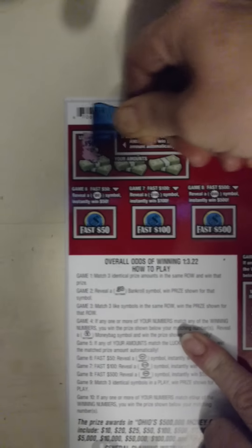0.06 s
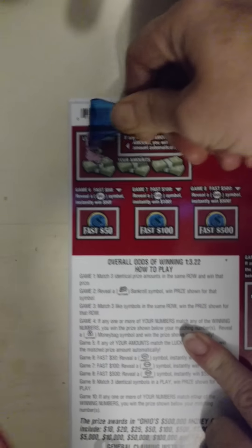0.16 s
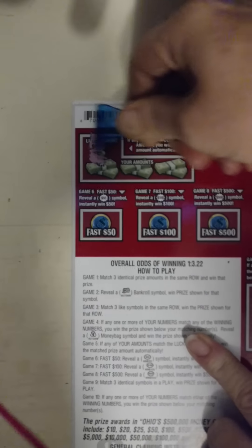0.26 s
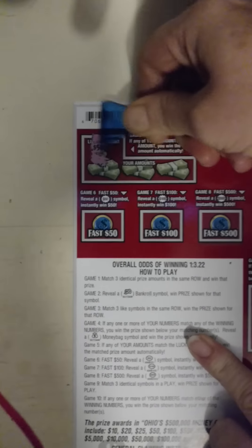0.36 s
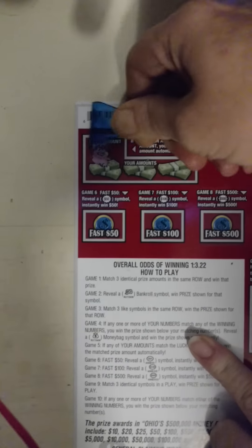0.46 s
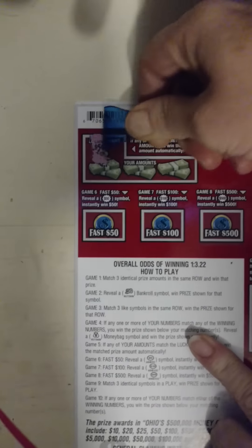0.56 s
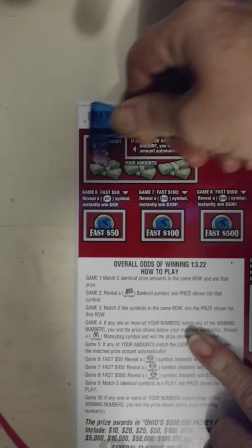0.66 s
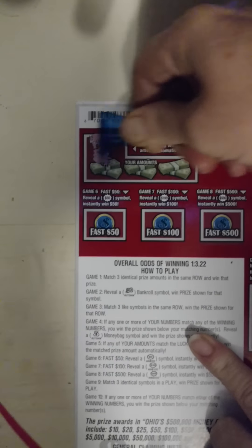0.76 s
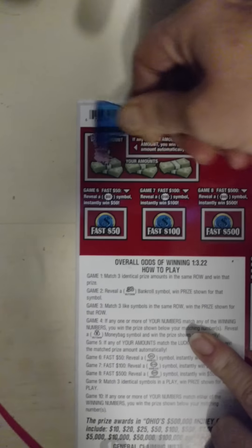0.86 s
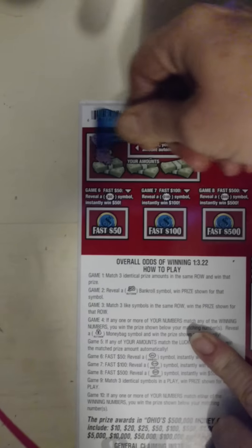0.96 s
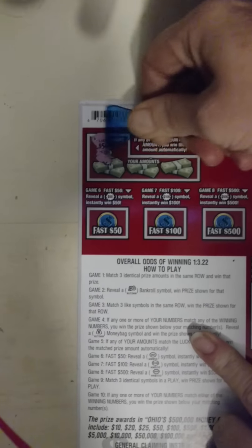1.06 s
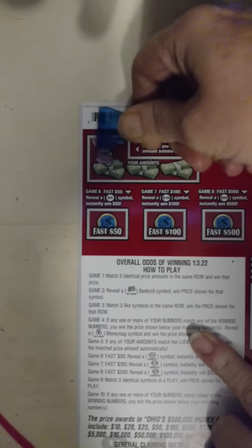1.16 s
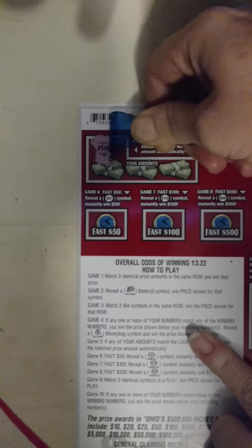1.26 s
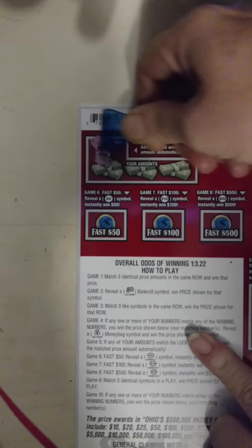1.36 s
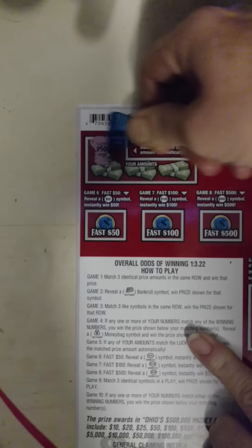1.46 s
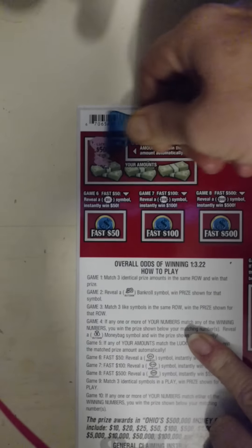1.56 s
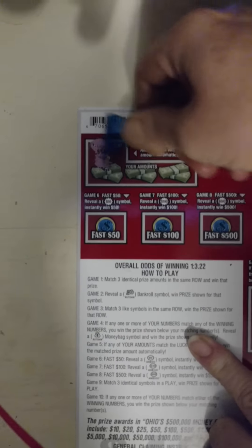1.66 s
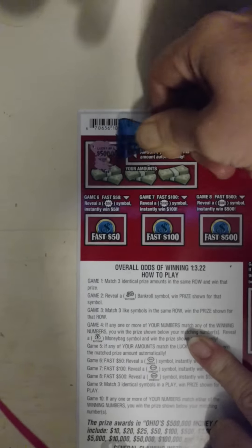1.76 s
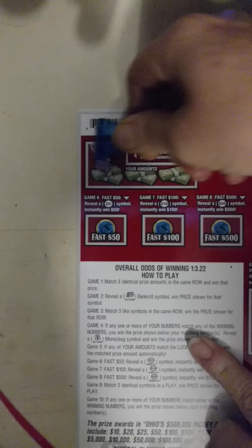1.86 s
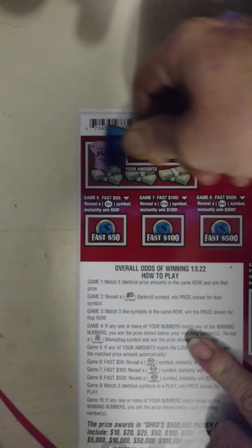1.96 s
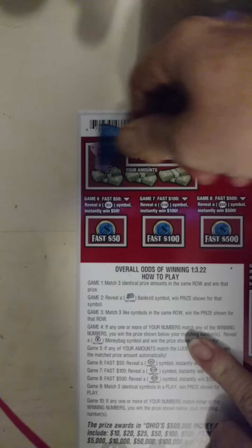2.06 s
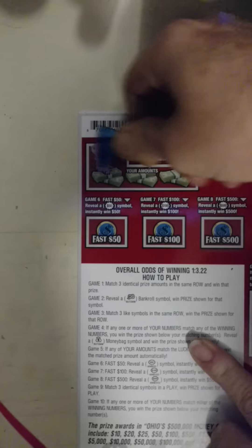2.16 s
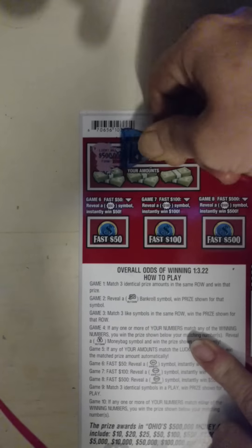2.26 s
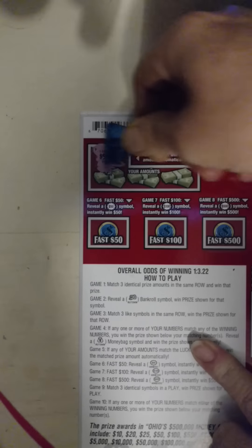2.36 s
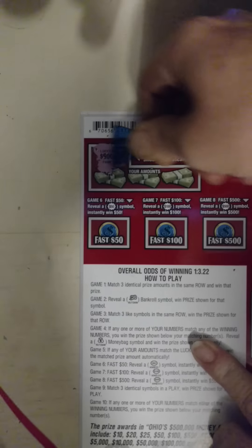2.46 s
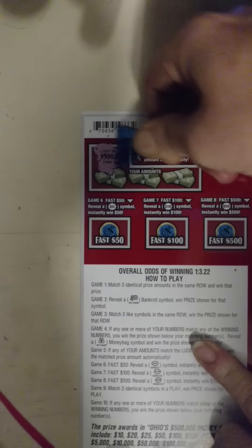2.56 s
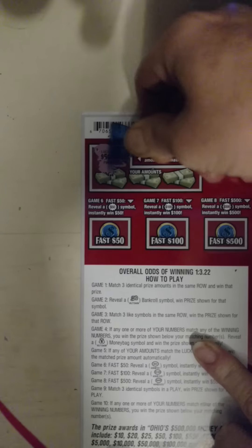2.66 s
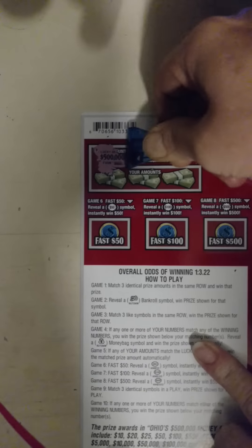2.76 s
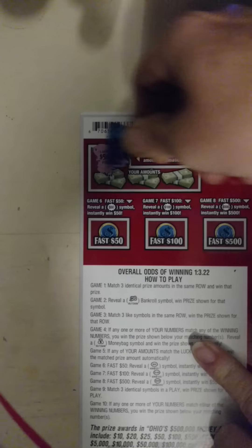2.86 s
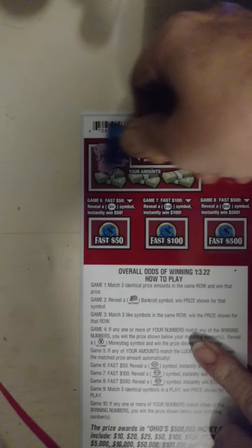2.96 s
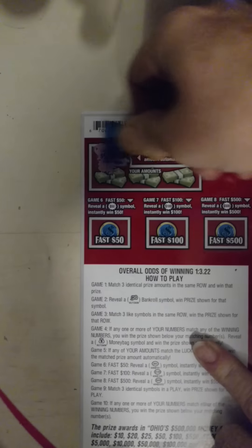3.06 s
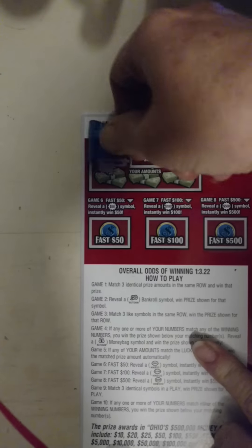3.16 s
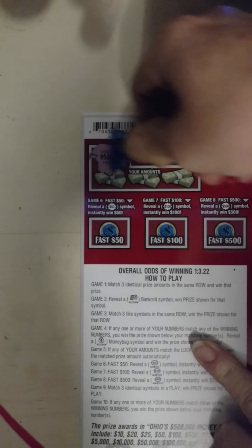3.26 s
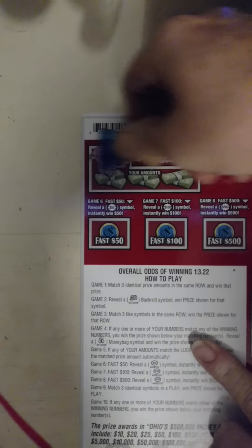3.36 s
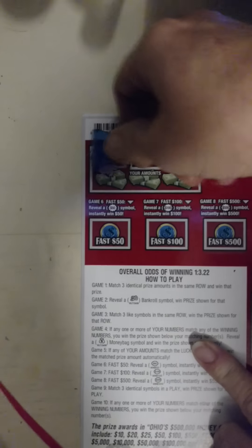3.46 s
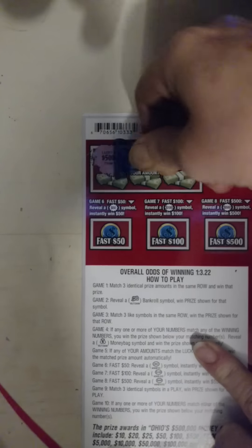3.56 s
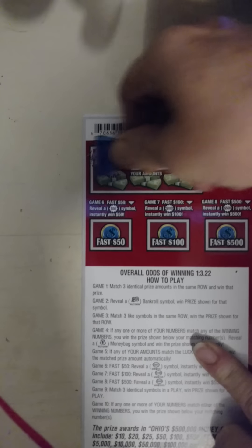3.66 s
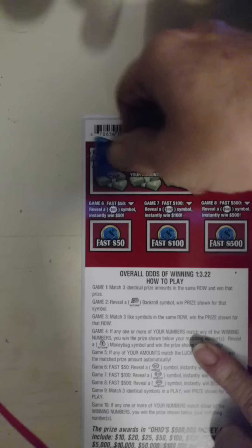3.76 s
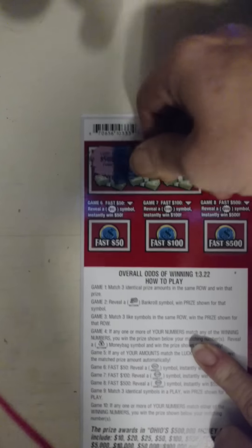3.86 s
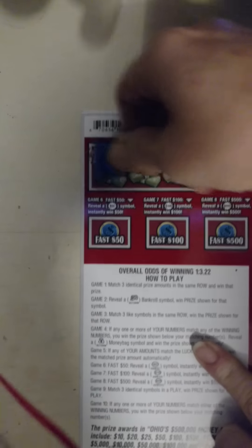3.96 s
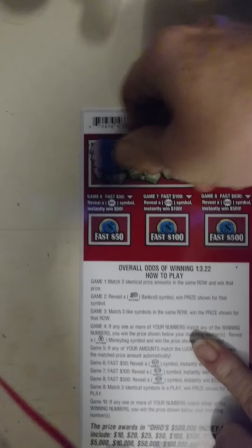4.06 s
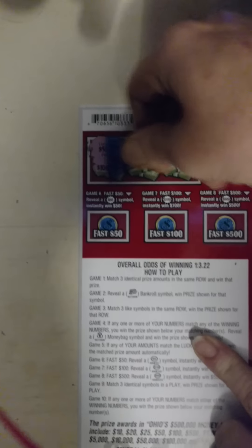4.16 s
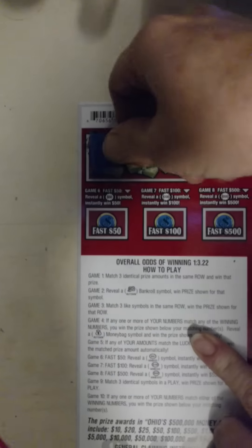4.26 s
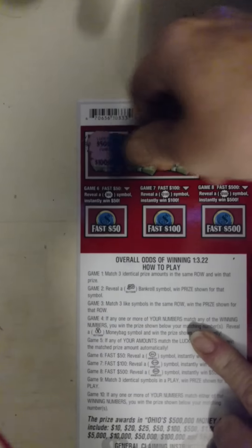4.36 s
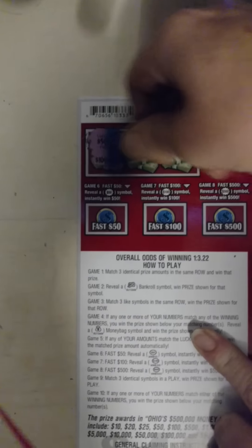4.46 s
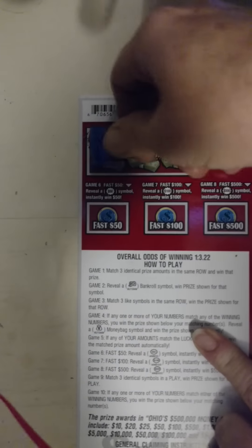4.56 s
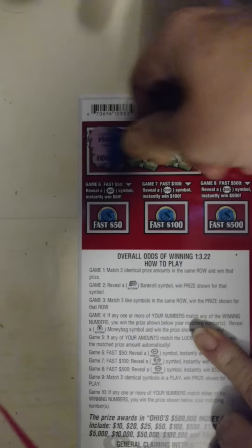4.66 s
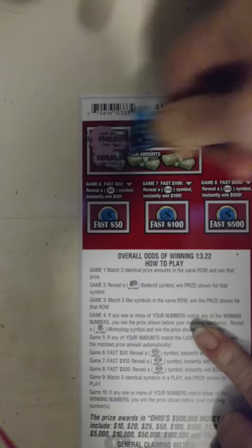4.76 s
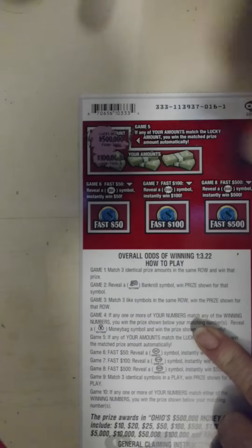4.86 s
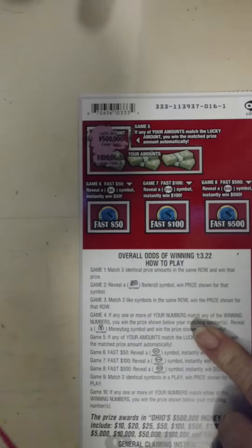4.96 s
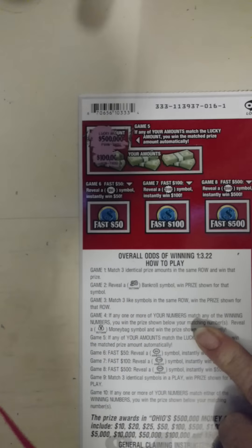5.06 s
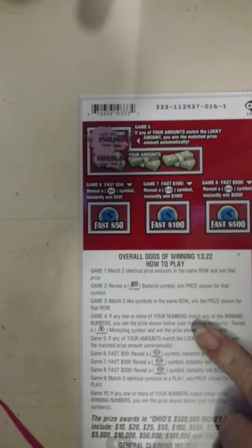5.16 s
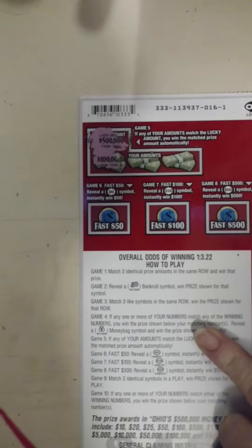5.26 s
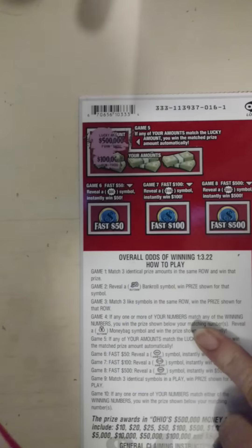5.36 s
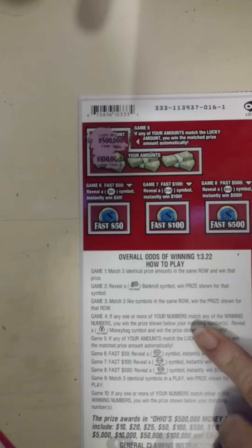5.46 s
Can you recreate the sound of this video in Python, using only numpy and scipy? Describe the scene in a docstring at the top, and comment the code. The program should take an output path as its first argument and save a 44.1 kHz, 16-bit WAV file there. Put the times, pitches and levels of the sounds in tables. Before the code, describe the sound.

Close, dry scratching of a small plastic scraper on a coated card, quick uneven rasps and ticks over table thuds, ending in a small clatter.

```python
"""A wooden table, close to a phone: a small plastic scraper scrubs the coating of a card that lies on it.
The edge taps down, rasps in short strokes and shakes the table; later the loose tool rattles down.
Noise and snaps drive the resonances of blade, coat, card, table and tool, over hiss and soft bumps.
The phone subtracts a late copy of each microphone port from the other, which combs mid and side."""
import sys
import numpy as np
from scipy import signal
from scipy.fft import rfft, irfft, next_fast_len
from scipy.io import wavfile
from scipy.ndimage import uniform_filter1d, map_coordinates

SR = 44100
rng = np.random.default_rng(int(sys.argv[2]) if len(sys.argv) > 2 else 0)


def persist_wave(psi):
    """Save psi, clipped to +-1, as 16-bit WAV."""
    counts = np.round(np.clip(psi, -1, 1) * 32767).astype(np.int16)
    wavfile.write(sys.argv[1], SR, np.atleast_2d(counts).T)


N = 242991  # samples

# Room and microphone hiss, spectrum before levelling. Each row: frequency in Hz, density in dB per Hz.
HISS_SPECTRUM = [(40, 4), (90, -1), (140, -0.5), (230, 1.5), (400, -9), (800, -17.5), (1500, -17),
                 (3000, -19), (6000, -25.5), (10000, -29.5), (15300, -39), (15700, -62)]
# Hiss the ports have in common. Each row: frequency in Hz, share of the near port's hiss in the far one.
HISS_ALIKE = [(300, 0.75), (600, 0.3), (1200, 0.05)]
# A faint hiss swells as the hand leaves. Each row: time in seconds, level in dB.
RUSTLE_LEVEL = [(4.9, -87), (5.0, -68), (5.12, -68.5), (5.5, -62)]
# Band of that hiss. Each row: centre in Hz, width in Hz, level in dB.
RUSTLE_BAND = [(3560, 1500, 0)]
# A finger shifts on the phone. Each row: start in seconds, level in dB, nominal pitch in Hz.
FINGER_BUMPS = [(0.57, -12.5, 218), (5.145, -27, 163), (5.417, -36.5, 128)]
# Decay of the short reflections. Each row: frequency in Hz, t60 in seconds.
WALL_DECAY = [(200, 0.28), (3000, 0.11), (10000, 0.0086)]
# The tool bounces. Each row: start in seconds, ping level in dB, ping pitch in Hz,
# then rattle, clack and top levels in dB re ping.
BOUNCES = [(5.389, -19, 4280, -18, -22, -15), (5.3955, -16, 4060, -6, -13.5, -42),
           (5.397, -16.5, 4070, -11.5, -30, -29), (5.4002, -25, 4050, -8, -26, -26),
           (5.4055, -29, 4280, 1, -18, -18), (5.4142, -30, 4280, 0, -14, -21),
           (5.4272, -33, 3980, 3, 9, -16.5)]
# Main modes of the free tool. Each row: centre in Hz, width in Hz, level in dB.
TOOL_MODES = [(3250, 500, -3), (4000, 180, -9), (4440, 230, 1), (5160, 180, 8)]
# High modes of the free tool. Each row: centre in Hz, width in Hz, level in dB.
TOOL_TOP_MODES = [(5970, 630, -1), (7100, 330, -3.5), (7940, 290, 6), (9200, 210, -3), (9920, 350, -4.5),
                  (13700, 2500, -23)]
# Tool against wood. Each row: centre in Hz, width in Hz, level in dB.
CLACK_MODES = [(896, 200, 5.5), (1540, 180, 6.5), (2230, 1300, 0)]
# The edge meets the card. Each row: time in seconds, crack level in dB, knock level in dB.
LANDINGS = [(0.0336, -21.5, -35), (0.143, -40, -36), (0.214, -30, -44), (0.264, -24, -34.5),
            (0.34, -62, -37), (0.378, -39, -33), (0.618, -52, -39), (0.689, -26.5, -45), (0.708, -44, -39),
            (0.7596, -30.5, -62), (0.855, -46, -35), (0.924, -29.5, -45), (0.959, -60, -38),
            (1.0941, -32, -30), (1.2003, -29, -32.5), (1.3444, -23, -26.5), (1.4535, -27, -31.5),
            (1.5026, -32, -41), (1.595, -43, -31.5), (1.6861, -24, -31.5), (1.778, -55, -36),
            (1.8096, -30, -28.5), (1.891, -41, -47), (1.9499, -21.5, -37), (2.0661, -64, -37),
            (2.1862, -31, -36.5), (2.233, -29, -61), (2.332, -36, -30), (2.39, -29, -49),
            (2.472, -23.5, -34.5), (2.602, -22.5, -29), (2.666, -61, -42), (2.7133, -23, -37),
            (2.77, -60, -46), (2.803, -60, -41), (2.842, -30, -30.5), (2.914, -60, -37), (2.9376, -39, -39),
            (2.99, -57, -41), (3.018, -42.5, -53), (3.088, -21, -28.5), (3.123, -48, -34),
            (3.241, -38.5, -40), (3.368, -58, -41), (3.435, -24, -33.5), (3.471, -31, -24),
            (3.5173, -23.5, -41), (3.606, -57, -36), (3.7196, -35, -35.5), (3.785, -51, -40),
            (3.906, -63, -35.5), (4.0, -52, -28), (4.0531, -24.5, -34), (4.1809, -45, -36.5),
            (4.266, -60, -35), (4.316, -42.5, -39.5), (4.4633, -39, -31.5), (4.61, -23, -38)]
# Strokes of the edge. Each row: start in seconds, length in seconds, rasp level in dB,
# then sheen and pressure on the table, both in dB re rasp.
STROKES = [(0.064, 0.019, -57, -11, -2), (0.093, 0.026, -53.5, -15, -8), (0.148, 0.087, -44, -42, 8.5),
           (0.308, 0.035, -47.5, -29, 0), (0.386, 0.024, -46.5, -35, 0), (0.444, 0.024, -42.5, -38, 3),
           (0.501, 0.021, -46, -29, 10.5), (0.634, 0.0046, -45, -26, -4), (0.694, 0.019, -43, -33, 0),
           (0.735, 0.028, -48.5, -24, -4), (0.812, 0.0072, -56, -17, -8), (0.929, 0.017, -45.5, -25, 0),
           (0.974, 0.029, -45, -15, 2), (1.104, 0.029, -55, -20, 5), (1.261, 0.027, -42, -12, 8),
           (1.368, 0.032, -60, -21, 0), (1.507, 0.019, -39, -18, 4), (1.583, 0.022, -42.5, -22, 0),
           (1.726, 0.041, -35.5, -11.5, 0), (1.82, 0.1, -57.5, -18, 2), (2, 0.017, -44, -10, -1),
           (2.129, 0.011, -44.5, -21.5, 2), (2.205, 0.084, -39, -8, -3), (2.337, 0.047, -40.5, -21, -9),
           (2.384, 0.0089, -38, -17, -4), (2.507, 0.035, -46, -8.5, -7), (2.759, 0.035, -43.5, -18, -8),
           (2.85, 0.018, -41.5, -20, 5), (3.105, 0.024, -51, -32, 2), (3.14, 0.035, -37, -27, 3),
           (3.26, 0.011, -43, -12, -13), (3.304, 0.023, -51, -20, 6), (3.375, 0.015, -52.5, -29, 3),
           (3.426, 0.038, -36, -28, 2), (3.53, 0.0066, -45.5, -27, 3), (3.576, 0.022, -47, -19, 2),
           (3.651, 0.021, -43, -20, -1), (3.713, 0.016, -40.5, -23, -2), (3.794, 0.025, -45.5, -11, 0),
           (3.831, 0.035, -42, -13, -1), (3.932, 0.073, -37, -26, -1), (4.07, 0.055, -44.5, -10.5, 2),
           (4.191, 0.065, -45.5, -18, 5), (4.342, 0.063, -41.5, -11.5, -5), (4.468, 0.023, -44, -20, -4),
           (4.513, 0.04, -44.5, -33, 8.5)]
# Weight of the hand. Each row: time in seconds, table rumble in dB.
HAND_WEIGHT = [(0.0, -42.5), (0.2, -47.5), (0.44, -41.5), (1.3, -46), (1.84, -44.5), (2.5, -52),
               (3.05, -54), (3.44, -40.5), (3.6, -49.5), (3.9, -46), (4.12, -52), (4.501, -49.5),
               (4.62, -55), (4.75, -77)]
# Low modes of the table. Each row: centre in Hz, width in Hz, level in dB.
TABLE_MODES = [(138.2, 16.6, 5), (355.3, 50.5, -14), (191, 22.8, 1), (231.2, 27.2, 0)]
# Modes of the card on wood. Each row: centre in Hz, width in Hz, level in dB.
CARD_MODES = [(352, 31, 1.5), (478.5, 27, -1), (553.3, 18.3, 1.5), (644, 18, -3.5), (723.6, 38, -3.5),
              (879, 58, -3), (1002, 22, -3.5), (1138, 48, -4.5), (1336, 73, -1.5), (1617, 60, -1.5),
              (1846, 192, -6)]
# Modes of the scraper blade. Each row: centre in Hz, width in Hz, level in dB.
EDGE_MODES = [(2100, 430, -14), (2620, 215, 1.5), (3096, 150, 2), (4600, 2870, -2), (5260, 900, 6),
              (6320, 646, 0)]
# Bands of the tearing coat. Each row: centre in Hz, width in Hz, level in dB.
SHEEN_MODES = [(9020, 510, 9.5), (11000, 6300, 4), (14560, 2700, 3.5)]
# Blade at the far port. Each row: frequency in Hz, level in dB re near port.
FAR_BLADE = [(1000, -17), (2600, -44), (4500, -12), (6000, -28), (7200, -20), (9000, -16.5), (14000, -15)]
# Card at the far port. Each row: frequency in Hz, level in dB re near port.
FAR_CARD = [(350, -13.5), (700, 0), (1000, -17), (2000, -51)]
# How much of the other port is subtracted. Each row: frequency in Hz, share.
CROSS_SHARE = [(300, 0.96), (2600, 0.99), (5200, 0.8), (13000, 0.72)]
# Delay of the subtracted copy. Each row: frequency in Hz, delay in microseconds.
CROSS_US = [(1300, 385), (2520, 395), (3900, 385), (10500, 381)]

AIR_DB = -58  # mean hiss level
REDRAW_S = .25  # the reflections are redrawn this often, so that no single tail colours the whole
PING_S, LEAD_S = 0.00317, 0.0023  # length of a ping; the rattle starts this much earlier
PUSH_HZ = 1480  # a knock is a soft contact, dull above this
HARD_DB, SOFT_DULLS = -21, 0.62  # a hard landing; dB of treble lost per dB softer
CATCHES_PER_S, CATCH_DB, CATCH_SPREAD_DB = 250, 3, 5  # the edge snags on a thicker flake
BITE_S, LET_GO_S = 0.0053, 0.042  # rise of a stroke, t60 after it
SWELL_DB_PER_S, ARCH_DB_PER_S, ARCH_MEAN = 77, 89, 0.76  # the longer a stroke, the more it grows and arches
# Card drive: rasp level of a usual stroke, gain over it, dB gained per dB of rasp.
USUAL_DB, BODY_DB, BODY_FOLLOWS = -36, 0.8, 0.97
DRAG_DB = -18.5  # light drag between strokes, re hand weight
JOLTS_PER_S = 45  # the wrist rocks on the table in small jolts
TABLE_LOW_HZ, TABLE_TOP_HZ = 79, 700  # the top radiates little below; the soft hand drives little above
SCRAPE_TOP_HZ = 15600  # upper limit of the rasp and table layers; the snaps are not limited here
ACROSS_S = 17.3 / 44100  # travel time from near port to far port
TOP_HZ = 16800  # the band ends here


def amp(db):
    """Decibels to a linear factor."""
    return 10 ** (np.asarray(db) / 20)


def unit(x):
    """x scaled to an rms of one."""
    return x / np.sqrt(np.mean(x ** 2) + 1e-20)


def along(points, hz):
    """Read (Hz, value) points on a log frequency axis."""
    f, v = np.transpose(points)
    return np.interp(np.log(hz + 1), np.log(f + 1), v)


def wobble(rate):
    """A smooth random curve, rate knots a second."""
    return map_coordinates(rng.standard_normal(int(N * rate / SR) + 4), [np.arange(N) * rate / SR])


def filtered(x, response):
    """x times a complex response of frequency."""
    m = next_fast_len(N + SR // 2)
    return irfft(rfft(x, m) * response(np.fft.rfftfreq(m, 1 / SR)), m)[..., :N]


def ring(force, modes):
    """A force through resonances of alternating polarity, scaled so that white noise keeps its rms."""
    def body(f):
        total = 0
        for k, (centre, width, db) in enumerate(modes):
            damping = 1j * f * width
            total = total + (-1) ** k * amp(db) * damping / (centre * centre - f * f + damping)
        return total

    power = np.mean(abs(body(np.linspace(0, SR / 2, 8192))) ** 2)
    return filtered(force, body) / np.sqrt(power)


def burst(s, db, rise, t60, into):
    """Add to a force track a short dying puff of noise that starts at s seconds."""
    t = np.arange(SR // 20) / SR
    puff = amp(db - 60 * t / t60) * (1 - np.exp(-t / rise)) * rng.standard_normal(len(t))
    return np.bincount(round(s * SR) + np.arange(len(t)), puff, N + SR)[:N] + into


def air():
    """Hiss of room and microphones, gently wavering; its bass is largely common to both ports."""
    near, own = rng.standard_normal((2, N))
    common = filtered(near, lambda hz: along(HISS_ALIKE, hz))
    far = common + filtered(own, lambda hz: np.sqrt(1 - along(HISS_ALIKE, hz) ** 2))
    hiss = unit(filtered(np.array([near, amp(-2.0) * far]), lambda hz: amp(along(HISS_SPECTRUM, hz))))
    return amp(AIR_DB + 1.3 * wobble(4)) * hiss


def room(x):
    """A short tail of decaying noise, different at each port and redrawn in overlapping pieces."""
    hop = round(REDRAW_S * SR)
    wet = np.zeros((2, N + 2 * SR))
    x = np.pad(x, (hop, 2 * hop))
    fade = np.sin(np.pi * np.arange(2 * hop) / (2 * hop))
    for start in range(0, N + hop, hop):
        hz, t, z = signal.stft(rng.standard_normal((2, SR // 5)), SR, nperseg=256)
        decay = amp(-60 * t / along(WALL_DECAY, hz)[:, None])
        tail = signal.istft(z * decay, SR, nperseg=256)[1]
        tail = tail / np.linalg.norm(tail[0])
        piece = signal.fftconvolve((x[start:start + 2 * hop] * fade)[None], tail, axes=1)
        wet[:, start:start + piece.shape[1]] += piece
    return wet[:, hop:hop + N]


def rustle():
    """A soft, uneven band of hiss: resonant noise under a wavering level."""
    s, db = np.transpose(RUSTLE_LEVEL)
    level = amp(np.interp(np.arange(N) / SR, s, db, left=-120) + 3.0 * wobble(25))
    return level * ring(rng.standard_normal(N), RUSTLE_BAND)


def bumps():
    """A few soft, quickly damped swings of the case, felt by the far port only."""
    case, t = np.zeros(N + SR), np.arange(SR // 20) / SR
    for s, db, hz in FINGER_BUMPS:
        age = 1.16 * t * hz
        swell = age * np.exp(1 - age) * amp(-2.5 * age)
        swing = np.sin(2 * np.pi * hz * t * (1.15 - 0.16 * age))  # the pitch sags
        case[round(s * SR):][:len(t)] += amp(db) * swell * swing
    return np.array([np.zeros(N), case[:N]])


def drop():
    """The loose tool chatters to rest: each bounce pings, rattles and clacks on the wood."""
    main, clack, top = np.zeros((3, N))
    ping, t = np.zeros(N + SR), np.arange(SR // 50) / SR
    swell = np.sin(np.pi * np.clip(t / PING_S, 0, 1)) ** 2
    for s, db, hz, rattle_db, clack_db, top_db in BOUNCES:
        ping[round(s * SR):][:len(t)] += amp(db) * swell * np.sin(2 * np.pi * hz * t)
        main = burst(s - LEAD_S, db + rattle_db, 0.00081, 0.009, main)
        clack[round((s + PING_S / 2) * SR)] = amp(db + clack_db)
        top = burst(s - LEAD_S, db + top_db, 0.00094, 0.069, top)
    rattle = amp(9.5) * ring(main, TOOL_MODES) + amp(12.5) * ring(top, TOOL_TOP_MODES)
    return ping[:N] + rattle + amp(11.0) * ring(clack, CLACK_MODES)


def taps():
    """Each landing is one snap of the blade, a short rattle and a soft push into card and table."""
    crack, push, hard = np.zeros((3, N))
    for s, crack_db, knock_db in LANDINGS:
        at = round(s * SR)
        crack = burst(s, crack_db - 19, .0003, .012, crack)
        crack[at] -= amp(crack_db + 7.0)
        hard[at:] = amp(SOFT_DULLS * (crack_db - HARD_DB))  # holds until the next landing
        push[at] = amp(knock_db)
    push = filtered(push, lambda hz: 1 / (1 + 1j * hz / PUSH_HZ) ** 2)
    direct = np.diff(hard * crack, prepend=0)  # the bare edge radiates treble best
    blade = amp(6.0) * ring(crack, EDGE_MODES) + amp(-3.5) * ring(hard * crack, SHEEN_MODES)
    blade = blade + amp(-14.0) * direct
    card = amp(-3.0) * ring(crack, CARD_MODES) + amp(15.0) * ring(push, CARD_MODES)
    return np.array([blade, card, amp(34.0) * ring(push, TABLE_MODES)])


def grit(spiky_db, clump_db, tint_db):
    """Tearing of tiny flakes: noise of uneven grain, in clumps whose colour drifts with the blade's angle."""
    size = amp(spiky_db * wobble(3000) + clump_db * wobble(220) + 0.31 * clump_db * wobble(60))
    snag_db = CATCH_DB + CATCH_SPREAD_DB * np.minimum(rng.exponential(size=N), 2)
    snag = (rng.random(N) < CATCHES_PER_S / SR) * amp(snag_db)
    z = signal.stft(size * (rng.standard_normal(N) + snag), nperseg=128)[2]
    tint = uniform_filter1d(rng.standard_normal(z.shape), size=3, axis=0)  # smooth over frequency
    tint = uniform_filter1d(tint, size=30, axis=1)  # and over time
    return unit(signal.istft(z * amp(tint_db * unit(tint)), nperseg=128)[1][:N])


def scrape():
    """Each stroke bites, arches and lets go; grit drives blade, coat and card, the hand shakes the table."""
    t = np.arange(N) / SR
    rasp, sheen, body, press = np.zeros((4, N))
    for s, length, db, sheen_db, press_db in STROKES:
        span = slice(round(s * SR), round((s + length) * SR) + SR // 10)
        u = t[span] - s
        way = np.clip(u / length, 0, 1)
        bite = np.clip(u / BITE_S, 0, 1) * amp(-60 * np.clip(u - length, 0, 1) / LET_GO_S)
        swell = SWELL_DB_PER_S * (way - .5)
        arch = ARCH_DB_PER_S * (np.sin(np.pi * way) - ARCH_MEAN)
        shape = bite * amp(length * (swell + arch))
        rasp[span] += shape * amp(db)
        sheen[span] += shape * amp(db + sheen_db)
        body[span] += shape * amp(USUAL_DB + BODY_DB + BODY_FOLLOWS * (db - USUAL_DB))
        press[span] += shape * amp(db + press_db)

    s, weight_db = np.transpose(HAND_WEIGHT)
    weight_db = np.interp(t, s, weight_db, right=-120)
    drag = amp(weight_db + DRAG_DB + 2.4 * wobble(30.2))
    jolts = (rng.random(N) < JOLTS_PER_S / SR) * np.sqrt(SR / JOLTS_PER_S) * amp(3 * rng.standard_normal(N))
    rumble = amp(weight_db) * (jolts + .4 * rng.standard_normal(N))

    flakes = grit(spiky_db=3, clump_db=2.5, tint_db=3)
    blade = amp(2.0) * ring((rasp + drag) * flakes, EDGE_MODES)
    coat = amp(2.0) * ring((sheen + amp(-8.0) * drag) * flakes, SHEEN_MODES)
    card_flakes = grit(spiky_db=3.5, clump_db=1.94, tint_db=2.17)
    card = amp(-3.0) * ring((body + amp(5.0) * drag) * card_flakes, CARD_MODES)
    table = ring(amp(8.5) * rumble + amp(3.5) * press * rng.standard_normal(N), TABLE_MODES)
    table = filtered(table, lambda hz: 1 / (1 + 1j * hz / TABLE_TOP_HZ) ** 3)
    return filtered(np.array([blade + coat, card, table]), lambda hz: 1 / (1 + (hz / SCRAPE_TOP_HZ) ** 40))


def ports(x, gain, lag_s):
    """Near and far port: the far one hears the source weaker and lag_s seconds later."""
    return np.array([x, filtered(x, lambda hz: gain(hz) * np.exp(-2j * np.pi * hz * lag_s))])


def scene():
    """Place every source at the two ports and add reflections, hiss and bumps."""
    blade, card, table = scrape() + taps()
    tool = drop()
    table = filtered(table, lambda hz: (1j * hz / (TABLE_LOW_HZ + 1j * hz)) ** 2)
    table = table + amp(-18) * room(table)[0]
    direct = ports(blade, lambda hz: amp(along(FAR_BLADE, hz)), ACROSS_S)
    direct = direct + ports(tool + rustle(), lambda hz: amp(-23), ACROSS_S)
    direct = direct + ports(card, lambda hz: amp(along(FAR_CARD, hz)), 1e-4)
    direct = direct + ports(table, lambda hz: amp(-3.8), 0)  # the broad table top reaches both at once
    reflected = room(amp(-12.5) * blade + amp(-12.0) * card + amp(-15) * tool)
    return direct + reflected + air() + bumps()


def record(dry):
    """Each channel is its port minus the other one, delayed; then the band limit."""
    def cross(hz):
        return along(CROSS_SHARE, hz) * np.exp(-2j * np.pi * hz * along(CROSS_US, hz) / 10 ** 6)

    def band(hz):
        dull = amp(-6 * np.clip((hz - 15200) / 500, 0, 1))  # the top of the band falls off gently
        return dull * (hz < TOP_HZ)

    late = filtered(dry[::-1], cross)
    return filtered(dry - late, band)


dry = scene()
out = record(dry)
persist_wave(out)
```